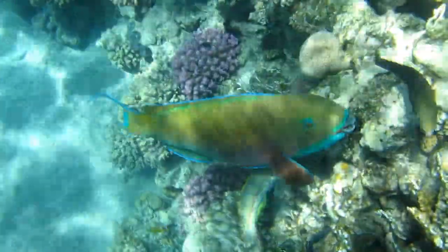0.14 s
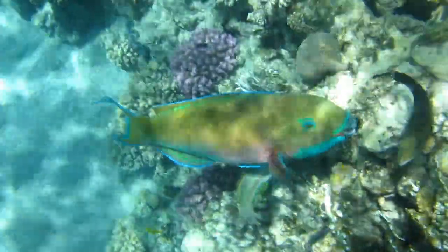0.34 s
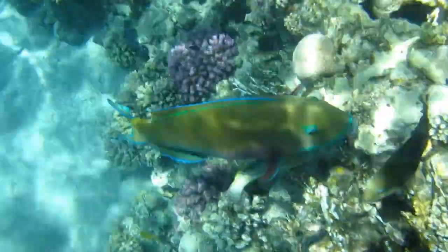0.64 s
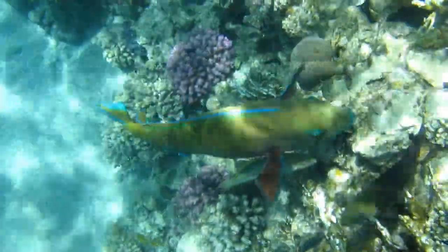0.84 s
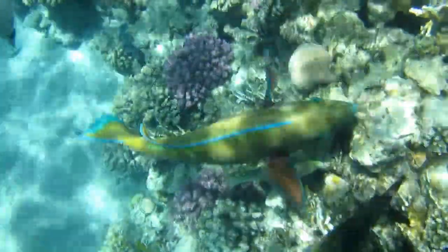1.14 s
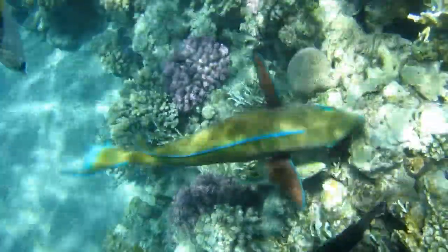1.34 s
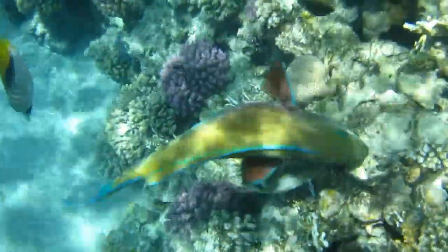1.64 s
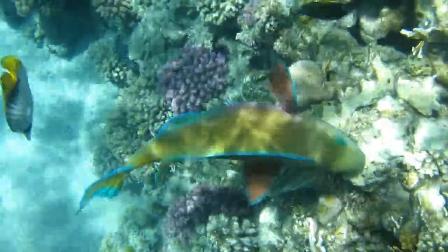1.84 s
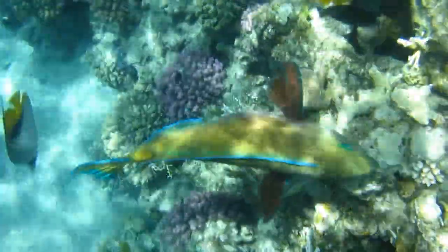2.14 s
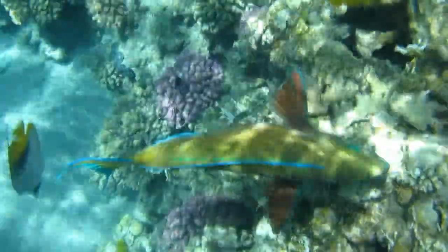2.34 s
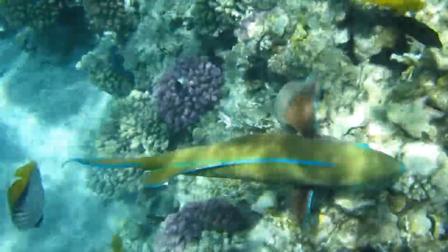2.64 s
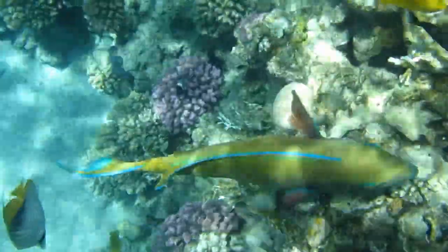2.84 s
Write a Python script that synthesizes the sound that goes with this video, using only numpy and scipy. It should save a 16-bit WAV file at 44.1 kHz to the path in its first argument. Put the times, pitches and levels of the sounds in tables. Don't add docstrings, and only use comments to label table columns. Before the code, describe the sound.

Crunching coral bites by a fish, with muffled water rumble, heavy thumps, sharp clicks and faint hiss

```python
import sys
import numpy as np
from scipy import signal
from scipy.fft import rfft, irfft, next_fast_len
from scipy.io import wavfile
from scipy.ndimage import uniform_filter1d

SR = 44100
rng = np.random.default_rng(int(sys.argv[2]) if len(sys.argv) > 2 else 0)


def wrap_up_sound(samples):
    columns = np.atleast_2d(samples).T
    tamed = np.clip(columns, -1, 1)
    steps = np.round(tamed * 32767).astype(np.int16)
    wavfile.write(sys.argv[1], SR, steps)


def voltage_ratio(decibels):
    exponent = np.asarray(decibels, float) / 20
    return 10 ** exponent


N = 130095


def unit(x):
    return x / np.sqrt(np.mean(x ** 2) + 1e-20)


def steady(x):
    return x / np.sqrt(np.abs(uniform_filter1d(x ** 2, size=3000)) + 1e-20)


def along(points, hz):
    f, v = np.transpose(points)
    return np.interp(np.log(hz + 1), np.log(f + 1), v)


def curves(rows):
    s, *cols = np.transpose(rows)
    return [np.interp(np.arange(N) / SR, s, c) for c in cols]


def filtered(x, response):
    m = next_fast_len(x.shape[-1] + 8192)
    return irfft(rfft(x, m) * response(np.fft.rfftfreq(m, 1 / SR)), m)[..., :x.shape[-1]]


def peak(f, hz, width_hz):
    return 1j * f * width_hz / (hz * hz - f * f + 1j * f * width_hz + 1e-9)


def dull(f):
    ratio = f / 9760
    return 1 / (1 - ratio ** 2 + 1j * ratio) ** 3


def rings(start_s, db, hz, t60, rise, size, soft=0.21):
    t = np.arange(size) / SR
    hz, t60 = hz[:, None], t60[:, None]
    tone = np.sin(2 * np.pi * hz * t * (1 + rise * t / t60))
    decay = voltage_ratio(db[:, None] - 60 * t / t60)
    wave = tone * decay * (1 - np.exp(-hz * t / soft))
    at = np.round(start_s * SR).astype(int)[:, None] + np.arange(size)
    return np.bincount(at.ravel(), wave.ravel(), N + size + SR)[:N]


def add_burst(out, s, db, pan_db, t60, colour):
    rise_s, echo_db, echo_t60 = .0004, -20, .035
    shared, spike, reef_lag_s = 1.23, 2.97, .00008
    t = np.arange(SR // 20) / SR
    noise = rng.standard_normal((3, len(t)))
    decay = voltage_ratio(-60 * t / t60) + voltage_ratio(echo_db - 60 * t / echo_t60)
    burst = (noise[:2] + shared * noise[2]) * (1 - np.exp(-t / rise_s)) * decay
    burst[:, 8:10] += spike * np.array([1, -1])
    lag_s = reef_lag_s * noise[2, -1] * np.array([[.5], [-.5]])
    burst = filtered(burst, lambda f: colour(f) * np.exp(2j * np.pi * f * lag_s))
    level = voltage_ratio(db + np.array([[pan_db], [-pan_db]]) / 2)
    burst = burst / np.abs(burst).max(axis=1, keepdims=True) * level
    out[:, round(s * SR):][:, :len(t)] += burst


# [t/s, level/dB, case pitch f/Hz]
SURGE = [(0, -24.5, 87.6), (.16, -32, 105), (.22, -25, 111), (.45, -24.5, 132), (.9, -22.5, 137.4),
         (1.07, -15, 148.6), (1.2, -16, 145), (1.25, -19.5, 127), (1.4, -16.5, 136.3), (1.7, -18, 118.5),
         (1.84, -18, 114.5), (1.88, -28, 128), (2.12, -30, 137), (2.22, -39.5, 91), (2.55, -34, 94.3),
         (2.75, -30, 116), (2.84, -29, 102), (2.95, -33.5, 105)]


def surge():
    return curves(SURGE)


def pushes(level_db, pitch_hz):
    count, pitch_spread, cycles, size_spread_db = 1500, 0.44, 4.3, 2
    edge_hz, push_db = 278, -4
    draw = rng.random((count, 2))
    at = draw[:, 0] * N
    hz = pitch_hz[at.astype(int)] * np.exp(pitch_spread * rng.standard_normal(count))
    size_db = -size_spread_db * np.log(draw[:, 1] + 0.02)
    swings = rings(at / SR, size_db, hz, 3 * cycles / hz, rise=0, size=3000)
    swings = filtered(swings, lambda f: 1 / (1 + (f / edge_hz) ** 8))
    return voltage_ratio(level_db + push_db) * steady(swings)


# [f/Hz, level/dB per Hz]
CHURN_SPECTRUM = [(25, -27), (125, 4.5), (210, -4.5), (280, -27), (420, -30), (680, -28.5), (900, -55.5),
                  (1600, -91)]


def turbulence():
    return filtered(rng.standard_normal((2, N)), lambda f: voltage_ratio(along(CHURN_SPECTRUM, f)))


def churn(flow, level_db):
    churn_db, growth = -5.5, 1
    mean_db = level_db.mean()
    return voltage_ratio(churn_db + mean_db + growth * (level_db - mean_db)) * steady(flow)


# [t/s, level/dB]
SWELL = [
    (0, -34.5),
    (1.2, -34.5),
    (1.9, -43.5),
    (2.2, -31.5),
    (2.45, -29),
    (2.95, -31),
]


def swell(flow):
    hz = 36.2
    return voltage_ratio(curves(SWELL)[0]) * unit(filtered(flow, lambda f: peak(f, hz, hz) ** 3))


# [t/s, level/dB]
GAIN = [
    (0, -52),
    (1.05, -51.5),
    (1.25, -52.5),
    (1.72, -52),
    (1.82, -58),
    (2.5, -56),
    (2.95, -53.5),
]


def gain_db():
    return curves(GAIN)[0]


def case_air():
    hz, width_hz, air_db = 323, 41.6, -1
    hum = unit(filtered(rng.standard_normal(N), lambda f: peak(f, hz, width_hz) ** 2))
    return voltage_ratio(gain_db() + air_db) * hum


# [f/Hz, level/dB per Hz]
HISS = [(240, -45), (400, -5), (650, -9.5), (1000, -13.5), (1700, -20), (5000, -27), (9500, -34),
        (12000, -55), (16500, -46)]


def reef_hiss():
    patchy_db, shared, hiss_db = 2.15, 0.067, 3
    crackles, crackle_db, spread_db = 700, -13, 4
    draw = rng.random((crackles, 4))
    far = np.zeros((2, N))
    at = (draw[:, 0] * (N - 9)).astype(int)
    far[:, at] = voltage_ratio(-spread_db * np.log(draw[:, 1] + 0.045)) * (draw[:, 2:].T - .5)
    z = signal.stft(rng.standard_normal((2, N)), nperseg=512)[2]
    field = uniform_filter1d(rng.standard_normal(z.shape), 6, axis=1)
    field = uniform_filter1d(field, 12, axis=2)
    wash = signal.istft(z * voltage_ratio(patchy_db * unit(field)), nperseg=512)[1][:, :N]
    wash = wash + shared * wash[::-1]
    hiss = unit(wash) + voltage_ratio(crackle_db) * unit(far)
    hiss = filtered(hiss, lambda f: voltage_ratio(along(HISS, f) - along(HISS, 5410)))
    return voltage_ratio(gain_db() + hiss_db) * hiss


# [f/Hz, level/dB]
HUM = [
    (2009, -78.5),
    (10037, -105.5),
    (15734, -90),
]


def electronics():
    t = np.arange(N) / SR
    return sum(voltage_ratio(db + 3.5) * np.sin(2 * np.pi * hz * t) for hz, db in HUM)


# [t/s, peak level/dB, centre f/Hz, left-right level/dB]
SNAPS = [(0.048, -36.5, 7140, -1.5), (0.0724, -29, 3140, 2), (0.2004, -34, 4560, -1),
         (0.238, -40.5, 9300, 9), (0.2903, -29, 6080, -2.5), (0.477, -33, 6400, 7.5),
         (0.6408, -32, 8200, 2.5), (0.7024, -35, 6200, -2), (0.7289, -36.5, 6460, -4.5),
         (0.7705, -34, 6420, 1), (1.111, -25.5, 4330, -9), (1.3267, -32.5, 7330, 6),
         (1.357, -31.5, 3420, 4), (1.6064, -41.5, 9000, 4), (1.8861, -42.5, 9200, 0),
         (2.0814, -46, 5020, 11), (2.1088, -43, 6700, 2), (2.122, -31, 4150, 7), (2.1896, -37, 7000, 6.5),
         (2.1972, -48, 9860, 7), (2.3336, -29.5, 4200, -3.5), (2.4347, -32, 6340, -1),
         (2.5601, -35.5, 3250, -5.5), (2.7063, -45, 9000, -1), (2.7935, -38, 7700, 2.5),
         (0.078, -36, 9200, 1), (1.858, -49.5, 8700, 0), (2.088, -41, 7000, -2), (2.133, -51, 4100, 8),
         (2.212, -41.5, 5200, 1), (2.279, -44.5, 4500, -4), (2.301, -47.5, 3500, 0),
         (2.589, -44.5, 6500, 0.5)]


def shrimp_snaps():
    t60, width, flat = 0.01, 0.34, 0.36
    out = np.zeros((2, N + SR))
    for s, db, hz, pan_db in SNAPS:
        add_burst(out, s, db, pan_db, t60,
                  lambda f: peak(f, hz, width * hz) ** 2 + flat * peak(f, 4300, 2300) * dull(f))
    return out[:, :N]


# [t/s, peak level/dB, pitch f/Hz, t60/s, left-right level/dB]
BUBBLES = [(0.0508, -21.5, 483, 0.033, 8), (.05, -40, 1200, 0.016, 3), (0.459, -37, 324.5, 0.31, -5),
           (.505, -40.5, 773, 0.089, -6.5), (.535, -33, 334, 0.1, -2), (0.698, -44.5, 332, 0.37, -4.5),
           (0.846, -47, 1220, 0.032, 25.5), (.987, -27, 540, .02, -3), (1.347, -35, 1040, 0.014, 1),
           (1.549, -28.5, 530, 0.044, 3.5), (2.068, -44.5, 1750, 0.015, -7), (2.132, -36, 485, 0.025, 12),
           (.236, -30, 437, 0.032, 6), (.263, -37.5, 700, 0.016, -4), (0.305, -35, 390, 0.049, 8),
           (.329, -37, 584, 0.012, 3), (1.576, -36, 600, 0.029, -1), (2.682, -36.5, 463, 0.021, -6)]


def bubbles():
    s, db, hz, t60, pan_db = np.transpose(BUBBLES)
    return np.array([rings(s, db + side * pan_db / 2, hz, t60, rise=0.012, size=8192) for side in (1, -1)])


# [t/s, peak level/dB, low crunch relative level/dB, centre f/Hz]
BITES = [(0.9482, -31, -15, 3380), (.963, -40, 6, 9000), (1.036, -36, -3, 4800), (1.0651, -31, -6, 5860),
         (1.077, -45.5, 9, 9100), (1.0865, -33.5, 0, 5900), (1.124, -33, 1, 4700),
         (1.136, -38.5, 4.5, 9700), (1.154, -37, 1, 8700), (1.1704, -22, -5, 6100),
         (1.1747, -30.5, 2.5, 4670), (1.181, -20, -15.5, 3420), (1.191, -33.5, -21, 2900),
         (1.7273, -40, 4, 9000), (1.7413, -35, -0.5, 4820), (1.7845, -26.5, -4.5, 9700),
         (1.7895, -26.5, -0.5, 2770), (1.799, -33.5, -12, 3220), (1.8224, -41, 6, 9000),
         (1.83, -43, 8, 3500), (2.1216, -25, -9.5, 2200), (.113, -41.5, -2, 2500), (1.045, -39, -9, 5000),
         (1.051, -36.5, 4, 4830), (1.059, -49, 12.5, 6000), (1.187, -30.5, -12, 8400),
         (1.7316, -44.5, 6, 4600), (1.76, -48, 6, 5160), (1.775, -48, 10, 5400), (1.804, -44, -1, 5150)]
CRUNCH_HZ = 1120


def bites():
    tick_t60, tick_pan_db, width, flat = .0075, -3, 0.19, 0.68
    leak = 0.059
    crunch_late_s, crunch_t60, low, low_hz = .0012, 0.021, 1.46, 626

    def crunch(f):
        return peak(f, CRUNCH_HZ, 520) ** 2 - low * peak(f, low_hz, 500) ** 2

    out = np.zeros((2, N + SR))
    for s, db, low_db, hz in BITES:
        add_burst(out, s, db, tick_pan_db, tick_t60,
                  lambda f: (peak(f, hz, width * hz) + flat * peak(f, 2300, 5000)) * (dull(f) + leak))
        add_burst(out, s + crunch_late_s, db + low_db + 7.5, 0, crunch_t60, crunch)
    return out[:, :N]


# [t/s, peak level/dB, pitch f/Hz, t60/s]
THUMPS = [(0.195, -19.5, 95, 0.19), (0.609, -17, 128.4, 0.088), (0.961, -9.5, 247.5, 0.042),
          (1.065, -11, 259, 0.035), (1.087, -13, 286, 0.032), (1.171, -7, 313, 0.015),
          (1.575, -13, 178.3, 0.16), (1.739, -3.5, 218, 0.015), (1.763, -5, 120.7, 0.15),
          (1.7862, 2.5, 210, 0.031), (1.7912, -0.5, 83, 0.065), (1.826, -3.5, 111.4, 0.087),
          (2.296, -17, 89.5, 0.12), (2.389, -8, 105.4, 0.079), (2.414, -22, 167, 0.078),
          (2.467, -14.5, 113, 0.056), (2.658, -10, 145, 0.052), (2.685, -13, 98, 0.099),
          (1.032, -13, 258, 0.031), (1.123, -28, 324, 0.018), (1.776, -3.5, 207, 0.022),
          (1.822, -16, 337, 0.016), (1.914, -22, 140.8, 0.19), (1.999, -25, 115.6, 0.15),
          (2.045, -23.5, 120, 0.15), (2.101, -26, 108, 0.084), (2.798, -30.5, 98.5, 0.45),
          (.515, -21.5, 186, 0.11), (0.941, -14, 128, 0.091), (1.045, -15, 204, 0.063),
          (1.1, -11.5, 183, 0.042)]


def thumps():
    s, db, hz, t60 = np.transpose(THUMPS)
    return rings(s, db + 2.5, hz, t60, rise=-0.24, size=8192, soft=0.33)


# [t/s, length/s, level/dB]
SCRAPES = [
    (1.027, .053, -47),
    (1.168, 0.016, -36.5),
    (1.731, .082, -49.5),
]


def scrapes():
    grit_per_s = 2200
    t = np.arange(N) / SR
    level = sum(voltage_ratio(db) * (np.abs(t - s - length / 2) < length / 2) for s, length, db in SCRAPES)
    grit = (rng.random(N) < grit_per_s / SR) * rng.standard_normal((2, N)) * rng.standard_normal(N)
    grit = filtered(grit, lambda f: peak(f, 2600, 6800) * dull(f) + 6.4 * peak(f, CRUNCH_HZ, CRUNCH_HZ) ** 2)
    return level * unit(grit)


def rumble():
    unlike, unlike_hz = 0.73, 700
    right_lead_s, right_bass_db = .00009, 2.5
    level_db, pitch_hz = surge()
    flow = turbulence()
    churning = churn(flow, level_db)
    mid = pushes(level_db, pitch_hz) + churning[0] + thumps() + swell(flow[1]) + case_air()
    side = filtered(churning[1], lambda f: unlike * f / (f + unlike_hz))
    right = filtered(mid - side, lambda f: np.exp(2j * np.pi * f * right_lead_s))
    return np.array([mid + side, right]) * voltage_ratio([[-right_bass_db / 2], [right_bass_db / 2]])


# [f/Hz, width/Hz, level/dB]
LEFT_PORT = [(1368, 205, 7.5), (2740, 890, 5), (6070, 660, 6), (9000, 850, 1.5)]
RIGHT_PORT = [(2137, 140, 10.1), (7000, 370, 4.4), (9200, 1200, 3.1)]
BOTH_PORTS = [(3500, 270, 3.5), (4080, 310, -4), (4650, 290, 7.5)]


def ports(x):
    def mode(f, hz, width_hz, db):
        return (voltage_ratio(db) - 1) * peak(f, hz, width_hz)

    def colour(f, table):
        own = 1 + sum(mode(f, *row) for row in table)
        common = np.prod([1 + mode(f, *row) for row in BOTH_PORTS], axis=0)
        return .5 * own * common

    left = filtered(x[0], lambda f: colour(f, LEFT_PORT))
    right = filtered(x[1], lambda f: colour(f, RIGHT_PORT))
    return np.array([left, right])


def scene():
    reef = reef_hiss() + shrimp_snaps() + bites() + scrapes()
    return rumble() + bubbles() + ports(reef)


def roll_off(x):
    return signal.sosfilt(signal.butter(12, 16260, fs=SR, output="sos"), x)


def record(dry):
    bass_cut_hz, clip_hardness, band_hz = 79.5, 9, 16000
    x = filtered(dry, lambda f: 1j * f / bass_cut_hz * peak(f, bass_cut_hz, bass_cut_hz))
    x = x + electronics()
    x = x / (1 + np.abs(x) ** clip_hardness) ** (1 / clip_hardness)
    mix = filtered(x, lambda f: f < band_hz)
    return roll_off(mix)


dry = scene()
out = record(dry)
wrap_up_sound(out)
```